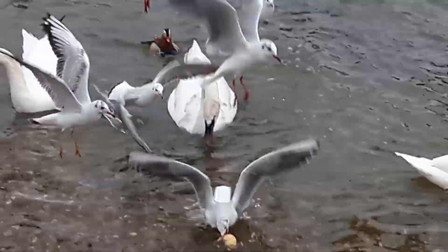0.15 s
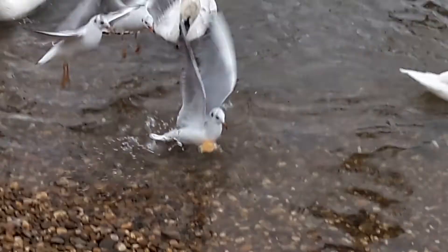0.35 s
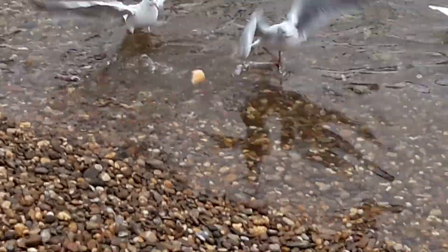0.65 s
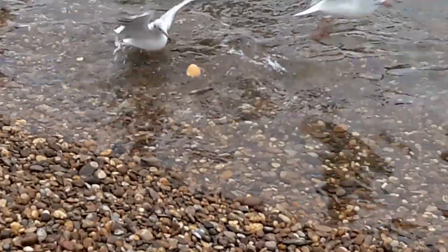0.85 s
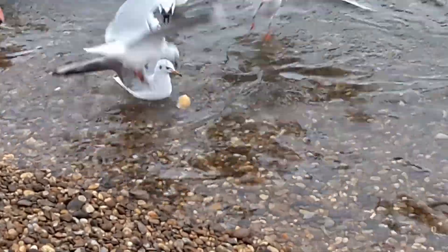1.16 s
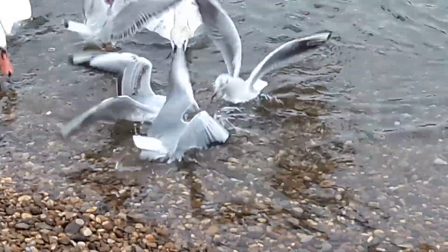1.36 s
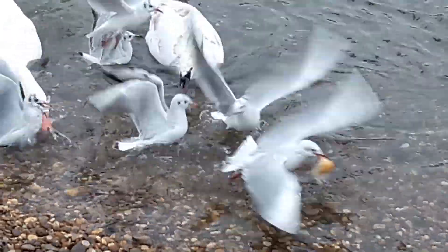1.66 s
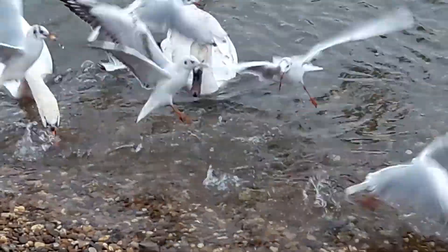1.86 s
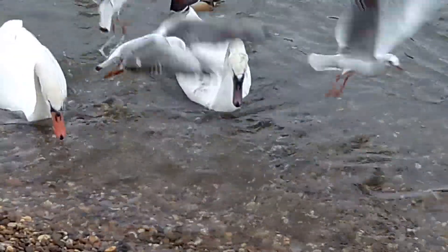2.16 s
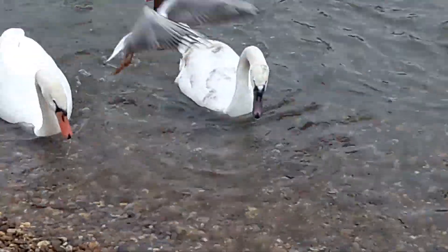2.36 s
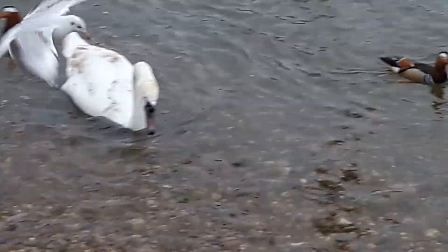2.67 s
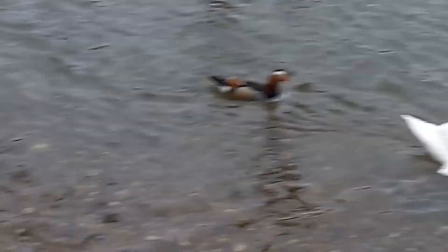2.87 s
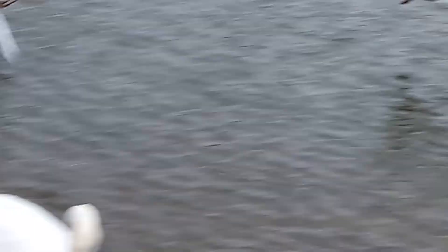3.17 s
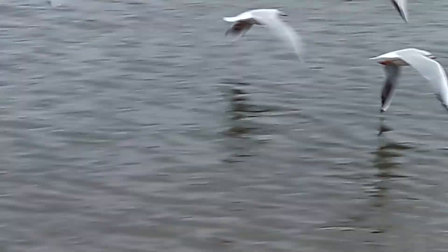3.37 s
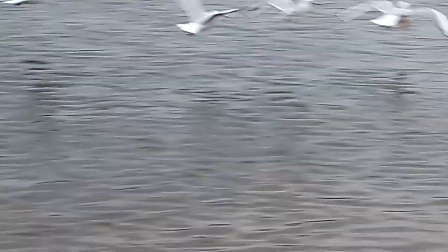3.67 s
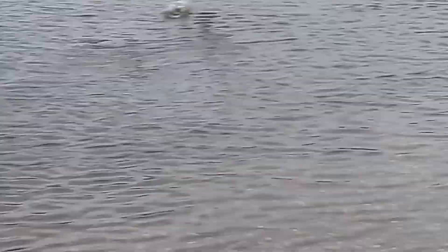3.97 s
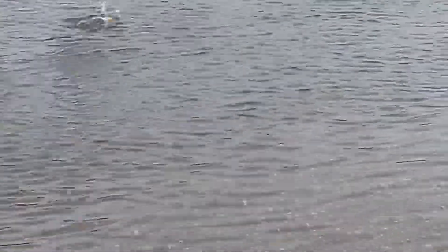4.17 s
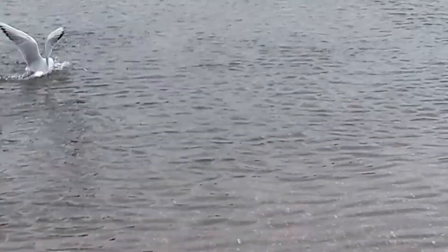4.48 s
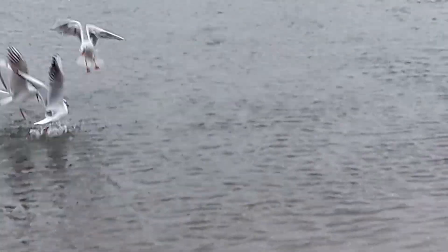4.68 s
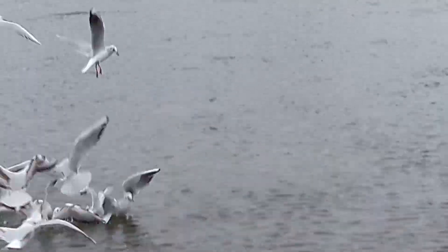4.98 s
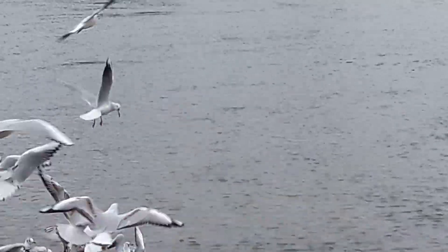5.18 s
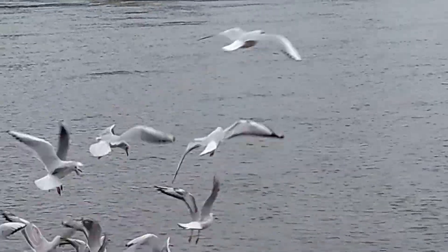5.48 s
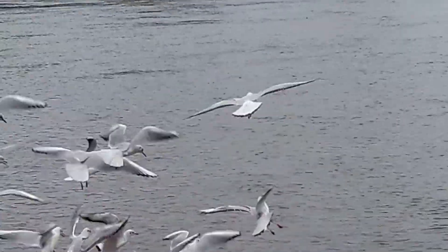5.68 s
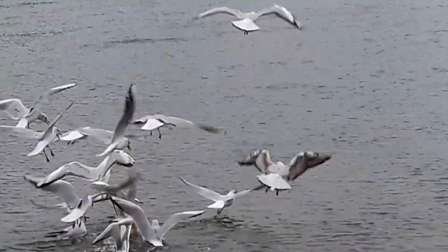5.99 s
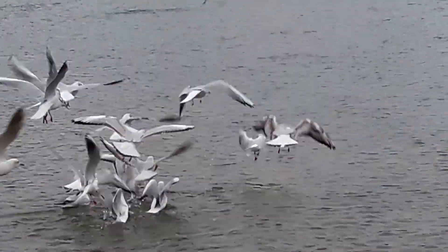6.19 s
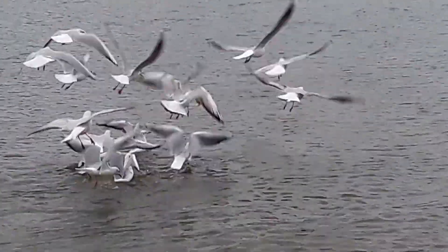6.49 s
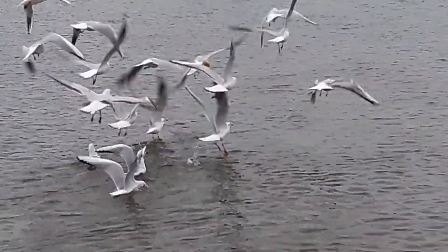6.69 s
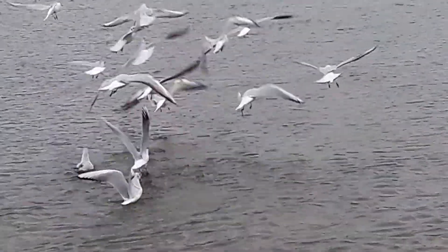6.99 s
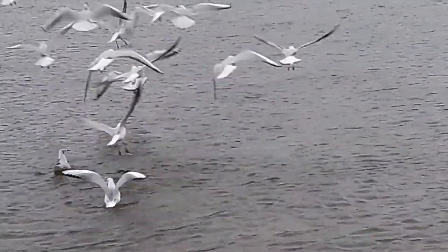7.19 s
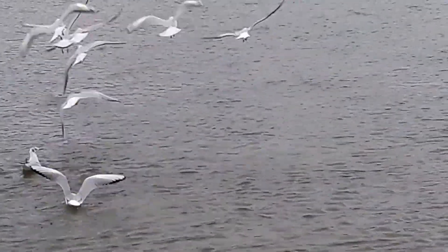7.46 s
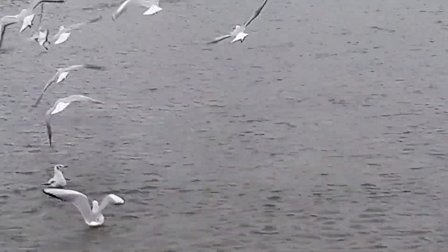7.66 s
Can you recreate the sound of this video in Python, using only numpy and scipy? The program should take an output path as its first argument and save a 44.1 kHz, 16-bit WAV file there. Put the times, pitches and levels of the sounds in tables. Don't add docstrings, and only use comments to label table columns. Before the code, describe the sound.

Outdoors by a river, hoarse gull voices near one kilohertz rattle and break into noise, with short echoes off water and bank. Close squawks and a long scream open, drops plop in a quieter middle, two more screams overlap, and after four and a half seconds many birds call at once. Soft wing splashes, spray ticks, low gusty microphone wind, and constant faint water hiss.

```python
import sys
import numpy as np
from scipy import signal
from scipy.fft import rfft, irfft, next_fast_len
from scipy.io import wavfile
from scipy.ndimage import uniform_filter1d

SR = 44100
rng = np.random.default_rng(int(sys.argv[2]) if len(sys.argv) > 2 else 0)


def voltage_ratio(level):
    return 10 ** (np.asarray(level, float) / 20)


def dump(signal):
    limited = np.clip(np.atleast_2d(signal).T, -1, 1)
    pcm = np.round(limited * 32767).astype(np.int16)
    wavfile.write(sys.argv[1], SR, pcm)


N = 345303


def evened(x):
    return x / np.sqrt(np.mean(x ** 2, axis=-1, keepdims=True) + 1e-20)


def read(points, hz):
    f, value = np.transpose(points)
    return np.interp(np.log(hz + 1), np.log(f + 1), value)


def colour(x, db_of):
    n = x.shape[-1]
    size = next_fast_len(n + 2048)
    gain = voltage_ratio(db_of(np.fft.rfftfreq(size, 1 / SR)))
    return irfft(rfft(x, size) * gain, size)[..., :n]


def wander(shape, hz):
    *rows, n = np.atleast_1d(shape)
    coarse = rng.standard_normal((*rows, n // 4 + 1))
    coarse = colour(coarse, lambda f: -10 * np.log10(1 + (f / (4 * hz)) ** 4))
    return evened(coarse).repeat(4, axis=-1)[..., :n]


def add(mix, s, sound, pan_db, lead=1):
    both_ports = sound * np.ones((2, 1))
    for port, side in enumerate((1, -1)):
        heard = both_ports[port]
        at = max(round(s * SR - side * lead / 2), 0)
        part = mix[port, at:at + len(heard)]
        part += heard[:len(part)] * 2 / (1 + voltage_ratio(-side * pan_db))


# (frequency [Hz], level [dB])
THROAT_SPECTRUM = [(500, -0.5), (1000, -7.5), (1500, 14.5), (2000, 3.5), (2600, 0.5), (3200, -2.5),
                   (4700, -16), (7000, -27), (12000, -32.5)]


def cry(rows, rough, rattle, rattle_hz, settle, treble_db, throat, second_db, third_db=0, third_hz=6700,
        top_hz=15500):
    s, effort_db, hz = np.transpose(rows)
    t = np.arange(s[0], s[-1] + .012, 1 / SR)
    effort_db = np.interp(t, s, effort_db)
    hz = uniform_filter1d(np.interp(t, s, hz), size=600)
    unsettled = settle * np.clip(1.5 - 2.2 * (t - t[0]) / (t[-1] - t[0]), 0, 1)

    flutter = np.cumsum(rattle_hz * (1 + .06 * wander(len(t), hz=25))) / SR % 1
    depth = rattle * (1 - .6 * unsettled)
    gate = 1 - depth + depth * 2 * np.sin(np.pi * flutter ** .85) ** 2
    k = np.arange(1, int(top_hz / hz.max()) + 1)[:, None]

    def throat_db(f, opening):
        heard = f / (throat * opening)
        second = second_db * np.exp(-((f / opening - 3200) / 650) ** 2)
        third = third_db * np.exp(-((heard - third_hz) / 1500) ** 2)
        return read(THROAT_SPECTRUM, heard) + second + third + treble_db * np.log2((f + 1) / 2200)

    slow = hz[::16]
    level_db = throat_db(k * slow, (slow / slow.mean()) ** 0.7)
    level_db += 2.1 * wander(level_db.shape, hz=12 * 16)
    level = voltage_ratio(level_db).repeat(16, axis=1)[:, :len(t)]

    scoop = rattle * (.015 - .14 * np.exp(-flutter / .2))
    shiver = .05 * rough * wander(len(t), hz=200)
    turns = np.cumsum(hz * (1 + scoop + shiver)) / SR

    chaos = wander((2, len(k), len(t)), hz=(80 + 230 * rough ** 2 + 120 * settle) * k ** .5)
    torn = rough ** (1.5 / k ** .4)
    torn = torn + (1 - torn) * unsettled / k ** .5
    halo = 1 - torn + .8 * torn * (chaos[0] + 1j * chaos[1])
    overtones = level * halo * np.exp(2j * np.pi * k * (turns + 0.0679 * k))
    voice = evened(overtones.real.sum(0))

    breath = colour(rng.standard_normal((2, len(t))),
                    lambda f: throat_db(f, 1) - 30 * (f < .9 * hz.mean()) - 60 * (f > top_hz))
    breath_level = voltage_ratio(-3.5) * (rough ** 2 + .6 * unsettled)
    voice = gate * (voice + breath_level * evened(breath))
    edge = np.clip(np.minimum((t - t[0]) / .019, (t[-1] - t) / .016), 0, 1)
    return voltage_ratio(effort_db) * evened(voice) * edge


# (time [s], effort [dB], pitch [Hz])
SCREAM_PATHS = [
    [(.315, -34, 860), (.36, -29, 1164), (.45, -24.5, 1186), (.55, -25, 1055), (.68, -24, 956),
     (.81, -28.5, 981), (.87, -43, 835)],
    [(2.975, -40.5, 1234), (3.02, -33.5, 1376), (3.09, -33.5, 1267), (3.24, -36.5, 1106), (3.42, -53, 1053)],
    [(3.23, -48, 951), (3.33, -26, 1049), (3.42, -27.5, 1029), (3.56, -33, 911), (3.61, -33, 951),
     (3.66, -46, 794), (3.74, -56, 673)],
    [(6.75, -44, 922), (6.82, -29.5, 1157), (6.89, -40.5, 996), (6.95, -38, 1037), (7.01, -37.5, 1120),
     (7.055, -49, 990)],
]
# (roughness [0-1], rattle depth [0-1], rattle rate [Hz], extra chaos at the start [share])
SCREAM_RATTLE = [(.29, .85, 84, .3), (.36, .92, 130, .06), (.26, .4, 75, .25), (.4, .65, 100, 0)]
# (treble [dB per octave], throat size [factor], second resonance [dB], third resonance [dB],
# third resonance [Hz])
SCREAM_THROAT = [(4, 1.013, -14, 5.5, 6600), (7, 0.88, -4, 14.5, 6060), (0.7, 1.17, -24, 3.5, 7100),
                 (1.5, 1.2, 4.5, -1, 5400)]


def screams():
    return [(path, *texture, *pose)
            for path, texture, pose in zip(SCREAM_PATHS, SCREAM_RATTLE, SCREAM_THROAT)]


CRY_ARCH = {"yelp": (.4, .6, .78, .8, -7, -8), "whistle": (.25, .85, .92, .96, -5, -3),
            "slide": (.25, .46, .9, .77, -3, -7), "squawk": (.42, .56, .8, .82, -9, -11),
            "rasp": (.4, .6, .93, .93, -6, -9), "rattle": (.32, .55, .86, .88, -6, -5),
            "shriek": (.45, .62, .84, .87, -6, -6), "scoop": (.45, .9, .8, .99, -5, -3)}
CRY_TEXTURE = {"yelp": (.38, .2, 78), "whistle": (.27, .2, 80), "slide": (.18, .1, 82),
               "squawk": (.52, .3, 86), "rasp": (.62, .3, 90), "rattle": (.55, .4, 95),
               "shriek": (.55, .35, 92), "scoop": (.2, .15, 80), "far": (.52, .35, 90)}
CRY_TONE = {"yelp": (0.13, 1.7), "whistle": (0.21, 1.4), "slide": (-1.2, 7.9), "squawk": (-0.3, -1),
            "rasp": (0.23, 2.2), "rattle": (0.41, 1.3), "shriek": (0.74, 6.1), "scoop": (1.5, 3)}
# (time [s], treble [dB per octave])
FLOCK_NEARNESS = [(0, 6), (1.3, 4.5), (2.9, -1.5), (4.4, 3), (6.0, 2.5), (7.8, 1)]


def arched(row, kind):
    s, length, db, hz, throat = row
    top, hold, from_share, to_share, from_db, to_db = CRY_ARCH[kind]
    rows = [(s, db + from_db, hz * from_share),
            (s + top * length, db, hz),
            (s + hold * length, db, hz),
            (s + length, db + to_db, hz * to_share)]
    extra_treble_db, second_db = CRY_TONE[kind]
    treble_db = np.interp(s, *np.transpose(FLOCK_NEARNESS)) + extra_treble_db
    second_db = second_db + 2 * (throat - 1)
    return rows, *CRY_TEXTURE[kind], 0, treble_db, throat, second_db


# (start [s], length [s], effort [dB], top pitch [Hz], throat size [factor])
YELP_CRIES = [(1.013, 0.066, -29, 1010, 1.18), (1.258, 0.071, -26.5, 1084, 1.4),
              (1.581, 0.12, -38.5, 458, 0.73), (2.391, 0.074, -33.5, 917, 1.21),
              (2.463, 0.068, -35.5, 395.7, 0.93), (2.9, 0.072, -29.5, 932, 0.84),
              (3.701, 0.11, -52.5, 786, 1.6), (4.55, 0.087, -30, 900, 1.28), (7.532, 0.1, -38.5, 770, 1.1)]
WHISTLE_CRIES = [(.245, 0.031, -32, 1024, 1.38), (4.263, 0.11, -34.5, 1184, 1.9),
                 (4.483, .07, -33, 1040, 1.61)]
SLIDE_CRIES = [(.05, 0.086, -33, 1070, 1.1), (7.609, 0.067, -40, 1214, 0.98)]
SQUAWK_CRIES = [(0.819, 0.15, -44, 775, 0.92), (5.33, 0.13, -35.5, 763, 1.1), (5.601, 0.14, -39.5, 780, 1),
                (6.94, 0.12, -36, 849, 1.12), (1.185, 0.057, -21, 533.5, 1.105),
                (1.156, 0.056, -26.5, 826, 1.2), (1.424, 0.043, -36, 807, 0.91),
                (1.484, 0.081, -34, 770, 1.01), (1.69, 0.076, -29, 937, 0.8),
                (3.938, 0.062, -34.5, 1070, 1.36), (2.134, 0.07, -42.5, 775, 1.04),
                (2.255, .105, -35.5, 538, 1.07), (4.63, 0.14, -35.5, 857, 1.21),
                (6.525, 0.092, -34.5, 853, 1.17), (6.6, 0.094, -38, 1195, 1.58),
                (7.135, 0.085, -33.5, 973, 1.22), (7.345, 0.065, -41.5, 815, 1.12)]
RASP_CRIES = [(.915, 0.095, -26.5, 706, 1.12), (0.901, .045, -28, 984, 1), (1.841, 0.041, -31, 940, 0.91),
              (1.075, 0.049, -40, 912, 0.79), (1.276, 0.076, -31.5, 1000, 0.81),
              (.02, 0.057, -32, 1162, 0.97), (0.149, 0.044, -29, 1190, 1.12),
              (.455, 0.058, -23.5, 1060, 1.36), (1.328, 0.059, -28, 950, 1.25),
              (2.066, 0.064, -58, 783, 1.5), (4.201, 0.079, -43, 939, 1.4), (4.367, 0.072, -31, 1086, 1.11),
              (4.769, 0.07, -33, 1053, 1.55), (4.855, 0.14, -38.5, 960, 1.32), (5.18, 0.1, -30, 1037, 1.02),
              (5.811, 0.064, -39, 1066, 1.35), (6.684, 0.061, -39, 890, 0.78)]
RATTLE_CRIES = [(7.651, 0.097, -38, 1087, 1.04), (7.729, 0.17, -49.5, 950, 1.2),
                (7.56, 0.13, -36, 800, 0.84)]
SHRIEK_CRIES = [(4.699, 0.05, -24.5, 1200, 1.5)]
SCOOP_CRIES = [(7.42, 0.155, -36, 1405, 1.09)]


def short_cries():
    kinds = {"yelp": YELP_CRIES, "whistle": WHISTLE_CRIES, "slide": SLIDE_CRIES, "squawk": SQUAWK_CRIES,
             "rasp": RASP_CRIES, "rattle": RATTLE_CRIES, "shriek": SHRIEK_CRIES, "scoop": SCOOP_CRIES}
    return [arched(row, kind) for kind, table in kinds.items() for row in table]


# (time [s], effort [dB],
# pitch [Hz])
FLOCK_PATHS = [
    [(4.685, -40, 930), (4.725, -27, 1030), (4.76, -22.5, 1075), (4.8, -41, 1000)],
    [(4.97, -35, 980), (5.01, -28.5, 1170), (5.06, -32, 1090), (5.14, -36.5, 1050), (5.17, -52, 1000)],
    [(5.31, -35, 1040), (5.36, -33, 1200), (5.45, -35, 1200), (5.5, -30, 1080), (5.545, -42, 900)],
    [(5.32, -33, 990), (5.37, -34, 1020), (5.44, -33.5, 1100), (5.53, -35.5, 980)],
    [(5.595, -29, 1100), (5.63, -31, 1160), (5.665, -34, 1230), (5.685, -47, 1200)],
    [(5.69, -31, 1080), (5.74, -31, 1160), (5.8, -35, 1170), (5.83, -45, 1100)],
    [(5.8, -43, 932), (5.855, -32, 1016), (5.875, -47, 987)],
    [(5.88, -32, 1080), (5.93, -34.5, 1050), (6.02, -31, 1110), (6.06, -32.5, 1140)],
    [(6.04, -34, 720), (6.1, -37, 800), (6.15, -36, 760)],
    [(6.13, -45, 950), (6.18, -34.5, 1020), (6.24, -36.5, 900)],
    [(6.235, -30, 1150), (6.29, -35.5, 1140), (6.36, -43.5, 1030)],
    [(6.35, -34, 1020), (6.41, -31.5, 1090), (6.49, -36, 1090), (6.51, -49, 1000)],
    [(7.22, -45, 880), (7.26, -36, 1050), (7.285, -47, 1040)],
    [(7.265, -50, 1080), (7.3, -36.5, 1170), (7.33, -61, 1150)],
    [(7.46, -44, 850), (7.53, -31.5, 1150), (7.57, -42, 1030)],
    [(5.9, -35, 759), (6.03, -37, 882), (6.11, -36.5, 810)],
    [(6.12, -44, 1500), (6.2, -39, 1375), (6.32, -42, 1253)],
    [(1.788, -28, 1030), (1.82, -27, 1130), (1.855, -35, 1000)],
]
# (treble [dB per octave], throat size [factor], second resonance [dB], third resonance [dB],
# third resonance if shifted [Hz])
FLOCK_THROAT = [(5, 0.97, 11, 8), (1, 1.4, -2, 14, 5200), (3, 1.58, 4, 3), (6.5, 1.23, 19, 7),
                (2.8, 1.2, 2.2, 0), (5.5, 1.4, 3, -3), (11, 1.36, 2, 21, 3200), (1, 1.62, -3.5, -3),
                (7.5, 0.93, 3.5, 4), (4, 0.97, 1, 6), (4.5, 1, 4.5, 9), (1.5, 1.76, 7.5, 8),
                (6, 0.43, 0, -9), (8, 1, 7, -8), (3.5, 1.3, 3, -3), (4, 1.3, 9.5, 6), (-0.5, 1.63, 0, 2),
                (-2.5, 1.1, -28, 10)]
# (roughness [0-1], rattle depth [0-1], rattle rate [Hz], extra chaos at the start [share])
FLOCK_RATTLE = (.46, .5, 98, 0)


def flock_voices():
    return [(path, *FLOCK_RATTLE, *pose) for path, pose in zip(FLOCK_PATHS, FLOCK_THROAT)]


# (start [s], end [s], effort [dB], treble [dB per octave])
CHORUS_SPELLS = [(0.02, 0.947, -37.5, -7.5), (1.396, 2.348, -49, 2), (3.045, 3.75, -39, -4.5),
                 (4.405, 5.297, -37, -3), (5.596, 6.722, -36.5, 7), (5.903, 6.503, -37.5, 3.5),
                 (7.15, 7.694, -46.5, -3)]


def chorus(count=3):
    out = np.zeros((2, N))
    for start, end, effort_db, treble_db in CHORUS_SPELLS:
        for i, (late, long, high, loud, side) in enumerate(rng.random((count, 5))):
            length, hz, db = .1 + .15 * long, 800 + 520 * high, effort_db + 5 * loud
            s = start + (i + late) * (end - start - length) / count
            rows = [(s, db - 9, .85 * hz), (s + .35 * length, db, hz), (s + length, db - 8, .85 * hz)]
            sound = cry(rows, *CRY_TEXTURE["far"], 0, treble_db, throat=1.214, second_db=5.5, top_hz=5500)
            add(out, s, sound, 6 * side - 3, lead=8 * side - 2)
    return out


def echoes(out):
    t = np.arange(SR // 4) / SR
    signs = rng.choice([-1., 1.], (2, len(t)))
    taps = signs * (rng.random((2, len(t))) < .04) * voltage_ratio(-60 * t / 0.076)
    taps = colour(taps, lambda f: 0.98 * np.log2((f + 300) / 3000))
    return voltage_ratio(-4.5) * signal.oaconvolve(out, taps / np.linalg.norm(taps[0]), axes=1)[:, :N]


# (time [s], lead of the left port [samples])
FLOCK_BEARING = [(0, 1), (.85, 1), (1.2, 5), (1.7, 1), (2.5, -1), (3.0, 8), (3.3, 0), (4.2, 6), (4.7, 3),
                 (7.8, 3)]


def gulls():
    cries = short_cries() + screams() + flock_voices()
    out = chorus()
    for call, (side, scatter) in zip(cries, rng.standard_normal((len(cries), 2))):
        s = call[0][0][0]
        top_hz = 9000 if s > 4.6 else 15500
        lead = np.interp(s, *np.transpose(FLOCK_BEARING)) + 1.3 * np.tanh(scatter)
        add(out, s, cry(*call, top_hz=top_hz), .4 + 1.5 * side, lead=lead)
    return out + echoes(out)


def blips(events, cycles, rise, lift_db):
    out = np.zeros((2, N))
    for s, db, hz, pan_db in events:
        u = np.arange(int(4 * cycles * SR / hz)) * hz / SR / cycles
        ring = u * np.exp(1 - 4.14 * u) * np.sin(2 * np.pi * cycles * u * (1 + rise * u))
        add(out, s, voltage_ratio(db + lift_db) * ring / abs(ring).max(), pan_db)
    return out


# (time [s], level [dB], pitch [Hz], left over right [dB])
WATER_DROPS = [(1.424, -17, 2700, 0), (1.564, -33, 1590, 0.5), (1.946, -8, 990, -0.5),
               (2.043, -18, 3930, 0.0), (2.117, -18, 1400, 0.0), (2.194, -15, 1020, -1),
               (2.371, -21, 770, 19), (2.749, -44, 790, -1), (2.805, -21, 880, 20), (2.857, -50, 1000, 5),
               (3.734, -28, 1510, 2.0), (3.924, -53, 832, 10)]


def drops():
    return blips(WATER_DROPS, cycles=3.6, rise=0.024, lift_db=-16.0)


# (time [s], level [dB])
SPRAY_TICKS = [(1.1583, -47), (1.5644, -37), (1.945, -38), (2.615, -46), (2.8898, -55), (3.7356, -42),
               (3.923, -45), (4.9494, -39), (5.9244, -40)]
# (start [s], length [s], level [dB])
NOISE_BURSTS = [
    (1.811, 0.063, -46.5),
    (2.995, 0.42, -47),
    (5.966, 0.095, -43.5),
    (7.153, 0.041, -58),
]


def spray():
    out, t = np.zeros((2, N)), np.arange(400) / SR
    for (s, db), noise in zip(SPRAY_TICKS, rng.standard_normal((len(SPRAY_TICKS), 400))):
        add(out, s, voltage_ratio(db + 3 - 60 * t / .015) * noise, .5)
    for s, length, db in NOISE_BURSTS:
        swell = np.hanning(round(length * SR))
        for pan_db in (30, -30):
            add(out, s, voltage_ratio(db) * swell * rng.standard_normal(len(swell)), pan_db)
    return colour(out, lambda f: -10 * np.log10(1 + (4500 / (f + 1)) ** 4))


# (time [s], level [dB], left over right [dB])
WIND_GUSTS = [(0.0, -27.5, -39), (0.08, -45.5, 7), (0.8, -32.5, 9), (1.35, -38, 0.5), (1.46, -32, -1.5),
              (1.57, -39, 2.5), (2.94, -26.5, 18.5), (3.31, -36.5, 9), (3.77, -31.5, 12.5),
              (3.81, -32.5, 24), (3.918, -35, 11), (4.49, -42, 5), (5.73, -41, 6.5), (5.78, -39, -8),
              (6.48, -36, 10), (6.89, -39.5, 4), (7.74, -36, 12), (7.83, -40.5, 6)]
# (frequency [Hz], level [dB per Hz])
LEFT_PORT_WIND = [(28, -60), (50, -11.5), (120, 3), (250, -1.5), (450, -7), (800, -16.5), (1500, -64)]
# (frequency [Hz], level [dB per Hz])
RIGHT_PORT_WIND = [(28, -46), (50, 0), (120, 6.5), (200, 0.5), (400, -14.5), (800, -11.5), (1500, -50)]


def wind():
    s, db, pan_db = np.transpose(WIND_GUSTS)
    t = np.arange(N) / SR
    db, pan_db = np.interp(t, s, db), np.interp(t, s, pan_db)
    bursts_db = 3.8 * wander((2, N), hz=42) + 1.4 * wander((2, N), hz=4)
    eddies = rng.standard_normal((2, N)) * voltage_ratio(bursts_db)
    left = evened(colour(eddies[0], lambda f: read(LEFT_PORT_WIND, f)))
    right = evened(colour(eddies[1], lambda f: read(RIGHT_PORT_WIND, f)))
    share = 1 / (1 + voltage_ratio(-2 * pan_db))
    return voltage_ratio(db + 7.5) * np.array([left * np.sqrt(share), right * np.sqrt(1 - share)])


# (time [s], level [dB], pitch [Hz], left over right [dB])
BUFFETS = [(0.004, -12.5, 248, -21), (2.795, -17, 420, 32), (2.847, -13.5, 368, 32),
           (4.026, -22, 520, 25), (2.372, -16.5, 600, 30), (3.815, -14, 567, 35)]
# (time [s], level [dB], pitch [Hz], left over right [dB])
MORE_BUFFETS = [(0.717, -35, 147.8, 4), (0.827, -17.5, 287, 25), (1.095, -32, 137, -4),
                (1.305, -21.5, 158, 6), (1.45, -19.5, 179, -17), (2.023, -22.5, 138, 20.5),
                (2.148, -25, 167, 12.0), (2.254, -32, 132, 9.0), (2.37, -10.5, 312, 31),
                (2.405, -20, 132, 15.0), (2.595, -11, 190, 30), (2.771, -33, 178, 26.5),
                (3.022, -33, 336, 18.0), (3.072, -18, 236, 31), (3.182, -30, 204.7, 20.0),
                (3.5, -23, 132, 17.0), (3.648, -17.5, 223, 20), (3.779, -20, 178, 29.0),
                (3.821, -7.5, 369, 36), (3.827, -7, 388, 35), (3.877, -18.5, 136, 17),
                (3.975, -21, 153, 12), (4.021, -21.5, 219, 21), (4.067, -15.5, 396, 31),
                (4.184, -23, 293, 20), (4.257, -23.5, 197, 20), (4.302, -23.5, 170, 19.5),
                (4.606, -25.5, 261, 23), (4.683, -23.5, 127, 10), (4.761, -29, 237, 16),
                (4.867, -23.5, 167, 23), (5.118, -24, 258, 31), (5.199, -22, 191, 24),
                (5.292, -29, 180, 19.5), (5.645, -24, 132.3, 16.5), (5.704, -18, 147, 16),
                (5.874, -28, 237, -8), (5.992, -13.5, 466, 26), (6.051, -21.5, 205, 11),
                (6.224, -34, 161, 4.5), (6.287, -17, 364, 28), (6.457, -20, 163, 18.5),
                (6.674, -14, 268, 24), (6.834, -21.5, 133, -25), (6.951, -19.5, 205, 8),
                (7.071, -23, 167, 17.5), (7.211, -23, 159, -8), (7.307, -28, 151, 9.0),
                (7.698, -29, 191, 19.5)]


def buffets():
    return blips(BUFFETS + MORE_BUFFETS, cycles=1.4, rise=0.011, lift_db=-1.1)


# (frequency [Hz], level [dB per Hz])
WASH_SPECTRUM = [(400, -20), (900, -0.5), (1500, 5.5), (2200, -8), (5600, -22.5), (8000, -22),
                 (9500, -29.5), (12500, -23), (15600, -27)]


def wash():
    frames, hz = N // 128 + 5, np.fft.rfftfreq(512, 1 / SR)
    a, b, c, d, patches = rng.standard_normal((frames, 257, 5)).T
    patches = uniform_filter1d(uniform_filter1d(patches, size=7, axis=0), size=12, axis=1)
    flicker = np.minimum(evened(uniform_filter1d(rng.exponential(1, frames), size=2)), 2.5)
    field_db = 3.5 * patches / patches.std() + 2.2 * flicker
    same = .35
    left = a + 1j * b
    right = same * left + np.sqrt(1 - same ** 2) * (c + 1j * d)
    spectrum_db = (read(WASH_SPECTRUM, hz) - 40 * (hz < 300))[:, None]
    z = np.array([left, right]) * voltage_ratio(spectrum_db + field_db)
    hiss = signal.istft(z, nperseg=512, noverlap=384)[1][:, :N]
    return voltage_ratio(-50 + 5.5) * evened(hiss)


# (frequency [Hz], level [dB])
MICROPHONE_RESPONSE = [(6000, 3.5), (8000, 4), (9500, -9), (10500, -3), (12500, -1), (15500, -1)]


def scene():
    near = gulls() + drops() + spray()
    near = colour(near, lambda f: read(MICROPHONE_RESPONSE, f))
    return near + wind() + buffets() + wash()


def roll_off(x):
    return signal.sosfilt(signal.butter(12, 15800, fs=SR, output="sos"), x)


def record(dry):
    ceiling = 0.7
    mix = ceiling * np.tanh(dry / ceiling)
    mix = colour(mix, lambda f: -10 * np.log10(1 + (32 / (f + 1)) ** 6) - 60 * (f > 15750))
    return roll_off(mix)


dry = scene()
out = record(dry)
dump(out)
```